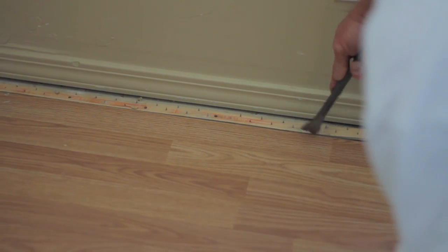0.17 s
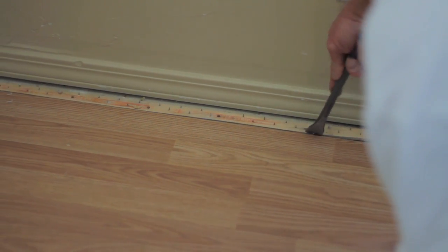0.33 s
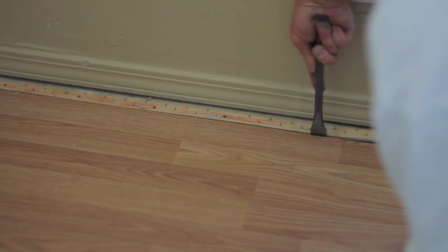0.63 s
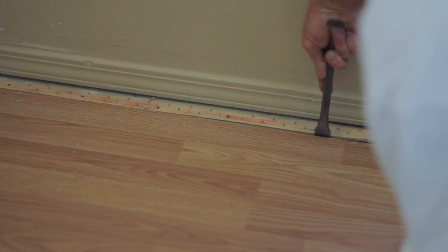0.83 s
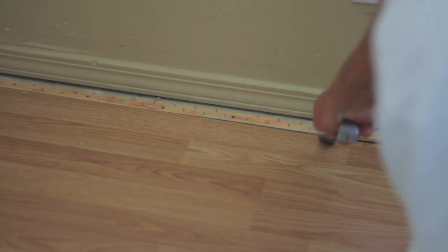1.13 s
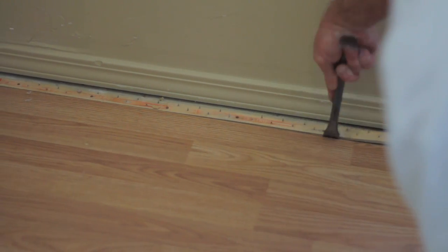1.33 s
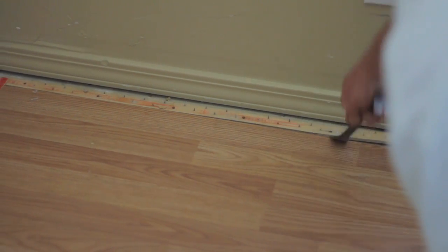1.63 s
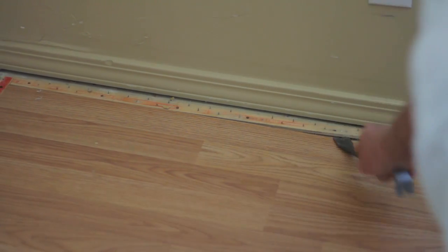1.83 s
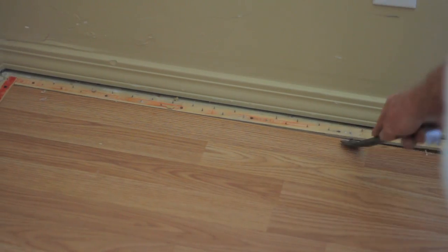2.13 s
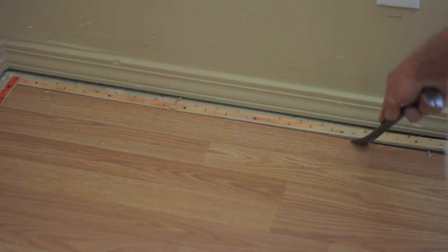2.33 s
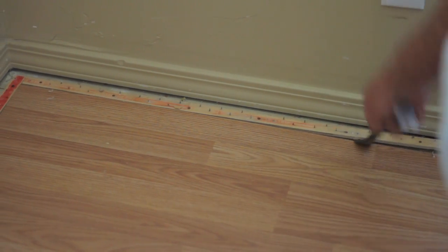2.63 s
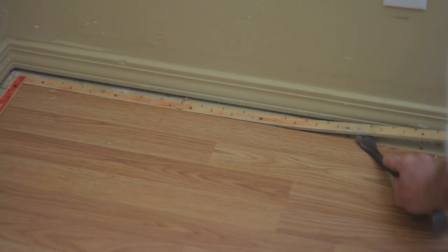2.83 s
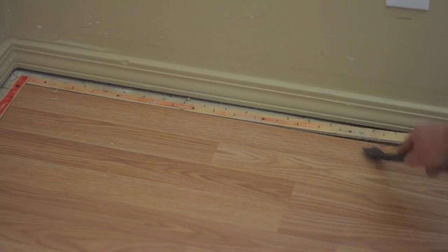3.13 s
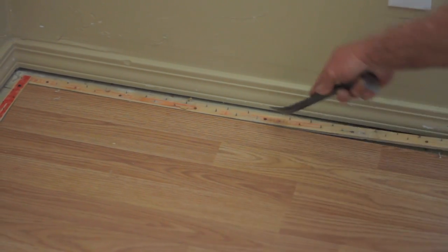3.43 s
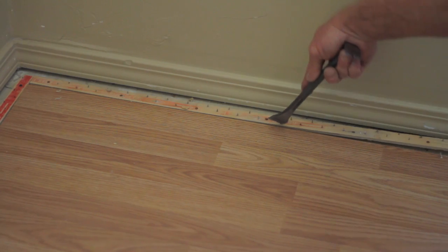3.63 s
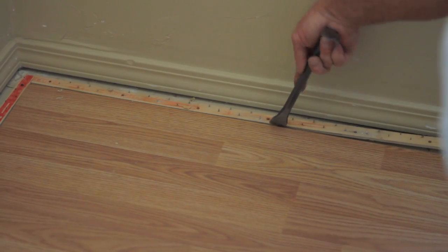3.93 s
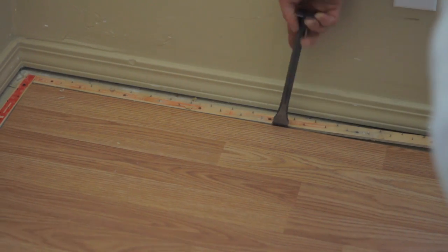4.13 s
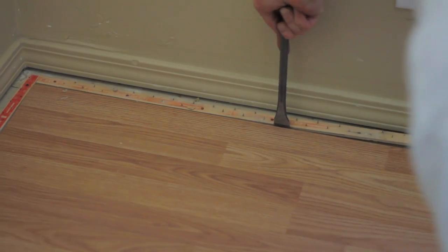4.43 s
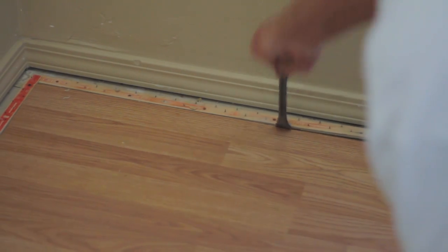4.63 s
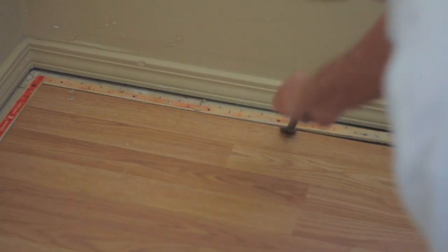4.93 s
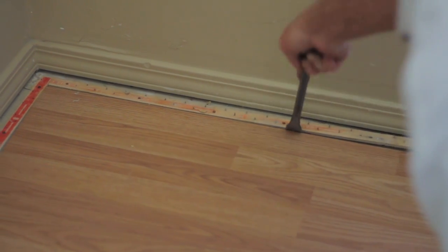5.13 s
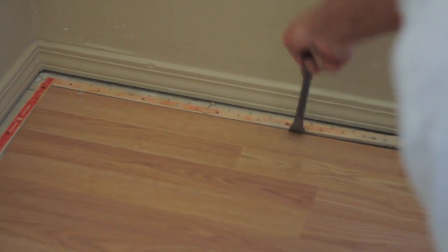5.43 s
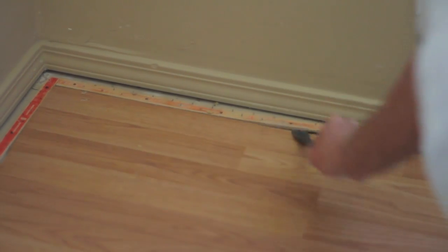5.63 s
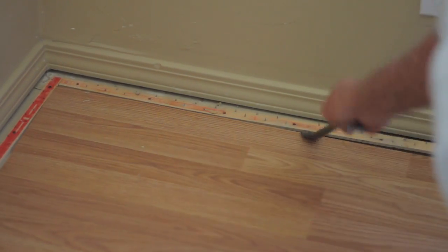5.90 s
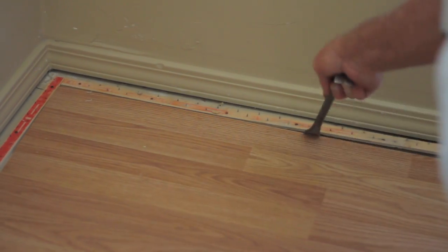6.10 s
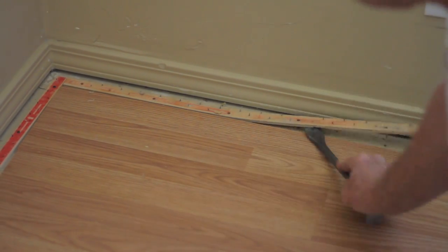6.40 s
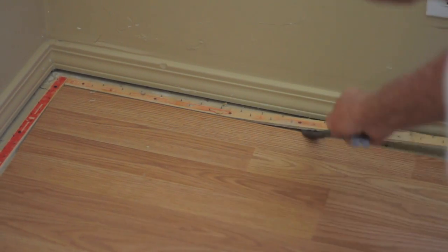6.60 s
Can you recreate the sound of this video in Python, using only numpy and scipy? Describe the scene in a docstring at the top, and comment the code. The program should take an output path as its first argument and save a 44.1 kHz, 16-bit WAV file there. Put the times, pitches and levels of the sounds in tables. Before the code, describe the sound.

Close indoor hand work: a pry bar bumps and rubs on a wooden floor with muffled thuds, short woody clacks and low rustling. A cluster of firmer knocks and crunches comes midway, then fewer bumps. A sudden bright nail crack follows, then a strip snap, the loudest hard knock of metal on floor, and another brittle snap with a low thud. Short room echo and soft steady hiss.

```python
"""A small steel pry bar levers a nailed wooden tack strip off the floor in a bare room.
The blade scrapes grit, crunches and knocks: slips and brief contacts are noise through resonant bands.
Splinters tick in bright bands. A nail tears out, the strip snaps twice and the bar strikes the floor:
sudden jolts excite many modes, with crumbling noise. Low notes rung by jolts and knocks are decaying sines.
A soft rustling bed and a quiet hiss are shaped noise; diffuse, decaying noise supplies the room's echo."""
import sys
import numpy as np
from scipy import signal
from scipy.fft import rfft, irfft, next_fast_len
from scipy.io import wavfile

SR = 44100
rng = np.random.default_rng(int(sys.argv[2]) if len(sys.argv) > 2 else 0)


def wrap_up_sound(samples):
    """Save the sound to the file named by the first command line argument, as 16-bit audio."""
    columns = np.atleast_2d(samples).T
    # keep every value between -1 and 1, then stretch to whole-number steps
    tamed = np.clip(columns, -1, 1)
    steps = np.round(tamed * 32767).astype(np.int16)
    wavfile.write(sys.argv[1], SR, steps)


N = 298108
TIME = np.arange(N) / SR
BLOW_TIME = np.arange(SR // 5) / SR

# Event levels are rms over 1/50 s, before any later filter or added debris; lengths are decay scales.
# Bar knocking on the floor as it is set and levered:
# (time [s], contact length [s], thump level [dB], board rap level [dB], upper cutoff of the rap [Hz])
KNOCK_EVENTS = [(0.074, 0.026, -65, -48, 513), (0.124, 0.011, -49, -43, 840),
                (0.427, .016, -47, -44.5, 770), (0.732, 0.0093, -41.5, -56, 456),
                (1.014, 0.025, -50, -60, 450), (1.118, 0.0023, -45, -80, 450),
                (1.208, 0.0086, -57, -51, 690), (1.593, 0.0039, -53, -82, 450),
                (1.704, 0.016, -46, -52, 450), (1.869, .012, -55, -59, 1000),
                (1.961, .022, -61, -62.5, 1600), (2.035, 0.031, -57, -68, 1450),
                (2.107, .0096, -56, -49.5, 690), (2.143, .0075, -49, -58, 1100),
                (2.42, 0.01, -52, -44.5, 1440), (2.63, 0.026, -44.5, -51.5, 840),
                (2.68, 0.0043, -37.5, -42.5, 636), (2.855, 0.035, -45.5, -56, 504),
                (2.963, 0.0048, -40, -39.5, 1140), (3.034, 0.038, -38, -54, 654),
                (3.297, 0.006, -40, -39, 1110), (3.727, .0074, -46, -43.5, 1390),
                (3.988, 0.009, -55, -48, 1350), (4.06, 0.022, -50.5, -47.5, 730),
                (4.36, 0.0054, -46, -53, 780), (4.689, 0.0071, -81, -63, 1400),
                (5.222, 0.0081, -46, -54.5, 1080), (5.798, 0.0038, -70, -54, 1430),
                (6.039, 0.0029, -66, -54.5, 590), (6.259, 0.01, -51, -51.5, 1050),
                (6.324, 0.0053, -45.5, -54.5, 1020), (6.495, 0.026, -53, -44, 1040),
                (6.516, 0.015, -38.5, -41, 1140)]
# Wood splintering under the blade: (time [s], length [s], snap level [dB])
SPLINTER_EVENTS = [(0.117, 0.0063, -64.5), (1.209, 0.0092, -58), (1.832, 0.0021, -74),
                   (1.855, 0.0033, -67.5), (1.871, 0.0089, -67), (2.106, .013, -65), (2.388, 0.0045, -60.5),
                   (2.416, 0.013, -64), (2.669, .014, -65.5), (2.96, 0.014, -67), (3.291, 0.012, -61.5),
                   (5.203, .001, -75.5), (5.766, 0.012, -57), (5.796, 0.00062, -63.5), (5.808, .0014, -71),
                   (6.309, 0.0017, -70), (6.474, .001, -64), (6.519, 0.01, -64)]
# Nail tearing out: (time [s], length [s], level [dB])
NAIL_EVENTS = [(5.0162, .004, -30), (5.0187, .006, -26), (5.0305, .006, -36), (5.045, .007, -37.5)]
# Strip snapping: (time [s], length [s], level [dB])
SNAP_EVENTS = [(5.7518, 0.0025, -38), (6.4545, 0.0036, -32)]
# Slipped bar striking the floor: (time [s], length [s], level [dB])
STRIKE_EVENTS = [(5.9016, .003, -23.2)]
# Low notes rung by jolts and knocks, including the nail's thump:
# (time [s], frequency [Hz], amplitude before onset and decay [dB], t60 [s])
LOW_NOTE_EVENTS = [(0.737, 62.3, -47, 0.28), (2.682, 103, -33, .13), (2.975, 57.4, -45.5, 0.99),
                   (2.966, 355, -40, 0.3), (3.052, 109.2, -36, 0.23), (3.297, 589, -28.5, 0.081),
                   (4.061, 638, -31.5, 0.072), (5.017, 152, -24, 0.14), (5.751, 347.5, -37, 0.14),
                   (6.515, 435, -38, 0.19), (6.548, 104.7, -41, 0.92)]
# Shoves forcing the blade under the wood: (start [s], end [s], peak of the swell [dB])
SHOVE_STROKES = [(.045, .16, -49), (1.23, 1.46, -63.5), (1.93, 2.18, -63), (2.87, 3.12, -52.5),
                 (3.24, 3.36, -48.5), (4.87, 5.01, -60.5)]
# Blade grinding through grit: (start [s], end [s], peak of the swell [dB])
SCRAPE_STROKES = [(-.06, 0.075, -57.5), (1.191, 1.291, -57), (1.82, 2.17, -70.5), (2.385, 2.44, -51),
                  (2.882, 3.112, -64), (3.223, 3.364, -55), (3.309, 3.346, -55.5), (4.873, 5.01, -56),
                  (6.467, 6.595, -60)]
# Loudness of the soft rustling bed, used relative to the mean of the rows: (time [s], level [dB])
BED_LOUDNESS = [(0.0, -61), (0.21, -75), (0.69, -75), (1.24, -68.5), (1.75, -73.5), (1.98, -65.5),
                (2.73, -68), (2.86, -63), (3.62, -70), (4.07, -58.5), (4.7, -73.5), (5.1, -59.5),
                (5.25, -66), (5.42, -81), (5.74, -71.5), (5.93, -55.5), (6.49, -63), (6.76, -62)]

# Resonances: (frequency [Hz], bandwidth [Hz], relative level density [dB per Hz])
# the heavy floor
THUMP_MODES = [(52, 86, -59), (97.2, 3.7, 7), (112.6, 38, 14.5), (166, 74, -6)]
# floorboards
BOARD_MODES = [(236, 193, -0.74), (339, 41, 6), (446, 70, -7.5)]
# the strip's clack under a knock
CLACK_MODES = [(627, 113, 15.5), (730, 27, -16), (846, 22, 13), (1260, 750, -9), (2050, 1300, -2)]
# breaking splinters, lower bands
SNAP_MODES = [(2290, 880, 0), (3650, 1500, 1), (5830, 1200, 0.5)]
# breaking splinters, treble bands
FIZZ_MODES = [(7500, 3700, 0.5), (11100, 3200, -3), (13900, 2400, 4.5)]
# nail tearing loose
NAIL_MODES = [(48, 40, -9), (122, 45, -1), (410, 90, -7), (638, 40, 1), (883, 45, -2), (990, 50, -7),
              (1145, 50, -1), (1280, 60, -11), (2220, 110, -14), (2750, 100, -21), (3280, 100, -12),
              (3490, 100, -11), (4090, 110, -15), (4390, 130, -12), (5410, 100, -19), (5700, 150, -20),
              (6300, 500, -25), (8700, 80, -22), (9730, 100, -18), (10750, 160, -17), (11900, 100, -19),
              (13300, 200, -16), (14400, 400, -19), (15050, 200, -15)]
# snapping strip
STRIP_MODES = [(119, 200, 0.5), (364, 77, 7.5), (680, 160, 8), (990, 186, 7.5), (1310, 290, -1),
               (2100, 280, -11), (2780, 1040, -4.5), (3840, 620, -0.5), (4840, 770, -0.5), (6200, 900, 2),
               (8000, 1300, -1), (10340, 1100, 1.5), (12700, 2700, -7), (14700, 910, -6)]
# bar against floor
STRIKE_MODES = [(48, 50, -11), (110, 25, -1), (160, 40, -2), (315, 70, -6), (600, 80, -3), (775, 100, 4),
                (920, 110, 0), (1350, 200, -12), (2400, 700, -24), (3700, 700, -19), (4600, 900, -15),
                (5300, 900, -17), (6600, 1100, -21), (8200, 1000, -24), (9700, 800, -22)]
# crushed fibres
CRUMB_MODES = [(1100, 1800, 0.5), (4200, 8100, -4.5), (8700, 4600, -20)]

# Spectra: (frequency [Hz], relative level density [dB per Hz])
# the soft rustling bed before its band-pass, which leaves it low with a faint airy treble
BED_SPECTRUM = [(40, -47), (100, -2), (220, -13.5), (350, -6), (700, -13.5), (1200, -19.5), (1700, -24),
                (4000, 12)]
# crushed grit
GRIT_SPECTRUM = [(800, 4.5), (2000, -7.5), (4000, 0), (6000, -2), (9000, -10), (15000, -8)]
# steady background hiss
HISS_SPECTRUM = [(20, 8.8), (45, 7.4), (100, 18.2), (200, 14), (400, 10.2), (700, 6.5), (1300, 4),
                 (2500, 2.05), (6000, 2.4), (15000, 1.9)]
# wood under a forced blade
CRUNCH_SPECTRUM = [(60, -15), (240, -0.5), (400, 1), (800, -11), (1250, -13.5), (1600, -34), (2300, -21.5),
                   (4000, -29.5)]

# Decay of the room: (frequency [Hz], t60 [s])
ROOM_DECAY = [(100, .26), (400, .27), (1000, .26), (4000, .28), (9000, .25), (15000, .22)]
# Echo of the room: (frequency [Hz], echo level [dB])
ROOM_LEVEL = [(100, -8), (400, -6), (1000, -7.5), (4000, -6.5), (9000, -8), (15000, -9)]

HISS_DB = -63.5
BED_DB, BED_FOLLOWS = -68, 1.11  # level at mean loudness; dB per dB of the loudness curve
BED_LOW_HZ, BED_TOP_HZ = 35, 1700
CLACK_DB, THUMP_LAG_S = -3, 0.0033  # clack against board rap; the heavy floor answers later
# after each knock the bar rocks back, weaker and duller
REBOUND_S, REBOUND_DB, REBOUND_PITCH_SHARE = 0.038, -15.5, 0.81
# small chance knocks; levels at mean bed loudness, random spread either way, dB per dB of bed loudness
NUDGES_PER_S, NUDGE_S, NUDGE_TOP_HZ = 5, 0.015, 1420
NUDGE_THUMP_DB, NUDGE_RAP_DB, NUDGE_SPREAD_DB, NUDGE_FOLLOWS = -62.5, -64.5, 1, 0.9
# fizz against snap at the reference length; quicker breaks are brighter
FIZZ_DB, FIZZ_AT_S, FIZZ_DB_PER_DOUBLING = 8.5, 0.0038, -2
# fibres around each splinter: earliest and latest moment, length, level against the splinter
FIBRE_BEFORE_S, FIBRE_AFTER_S, FIBRE_S, FIBRE_DB = 0.011, 0.05, 0.0028, -18
KNOCK_ECHO_DB = -1.5  # dull sounds come mostly straight through the floor, so they are drier
CUTOFF_HZ = 15700


def from_db(db):
    """Level in decibels gives amplitude gain as a power of ten."""
    return 10 ** (np.asarray(db) / 20)


def rms_one(x):
    """Division by the root mean square gives unit mean power."""
    return x / np.sqrt(np.mean(x ** 2) + 1e-20)


def unit_energy(rows):
    """Division by the norm gives each row unit energy."""
    return rows / np.linalg.norm(rows, axis=1, keepdims=True)


def at_hz(points, hz):
    """Interpolation is linear in the logarithm of frequency."""
    freqs, values = np.transpose(points)
    return np.interp(np.log(np.maximum(hz, 1)), np.log(freqs), values)


def coloured(x, spectrum):
    """Multiplication in the frequency domain shapes the spectrum; mean power is then one."""
    size = next_fast_len(N)
    gain = from_db(at_hz(spectrum, np.fft.rfftfreq(size, 1 / SR)))
    return rms_one(irfft(rfft(x, size) * gain, size)[:N])


def band(x, low_hz, high_hz, order):
    """A causal band-pass responds only after its excitation."""
    edges = [max(low_hz, 10), min(high_hz, 0.45 * SR)]
    sos = signal.butter(order, edges, "band", fs=SR, output="sos")
    return signal.sosfilt(sos, x + 1e-18)


def grains(count, per_s, spread_db):
    """Granular noise: tiny impulses of uneven size occur at random moments."""
    sizes = rng.standard_normal(count) * from_db(spread_db * rng.standard_normal(count))
    return sizes * (rng.random(count) < per_s / SR)


def strokes(rows):
    """Stroke envelope: each swells and fades as half a sine."""
    out = np.zeros(N)
    for start, end, db in rows:
        progress = np.clip((TIME - start) / (end - start), 0, 1)
        out += from_db(db) * np.sin(np.pi * progress)
    return out


def bed_loudness_db(times):
    """Loudness of the bed is interpolated relative to the mean of its points."""
    s, db = np.transpose(BED_LOUDNESS)
    return np.interp(times, s, db - db.mean())


def contacts(lengths, roughness_db, punch):
    """Rough contact, one per row: a clean jolt within a rush of tiny slips that swells and dies."""
    draws = rng.standard_normal((len(lengths), 2, len(BLOW_TIME)))
    age = BLOW_TIME / np.maximum(lengths, 5e-4)[:, None]  # in contact lengths
    envelope = age ** 0.66 * np.exp(-2.6 * age)
    slips = draws[:, 0] * from_db(roughness_db * draws[:, 1]) * envelope
    jolt = np.diff(age > 0.1, axis=1, prepend=False)  # a single sample
    return unit_energy(slips) + punch * jolt


def rung(force, level_db, modes, order):
    """Modal excitation: each contact rings a body's resonances, alternate in sign."""
    rings = 0
    for k, (hz, width, db) in enumerate(modes):
        ring = unit_energy(band(force, hz - width / 2, hz + width / 2, order))
        rings = rings + (-1) ** k * from_db(db) * np.sqrt(width) * ring
    # rms is referred to a fiftieth of a second
    return from_db(level_db)[:, None] * unit_energy(rings) * np.sqrt(SR / 50)


def placed(sounds, times):
    """Superposition: short sounds add at their own times."""
    out = np.zeros(N + 2 * len(BLOW_TIME))
    for s, sound in zip(times, sounds):
        start = int(s * SR)
        out[start:start + len(sound)] += sound
    return out[:N]


def background_hiss():
    """Stationary noise: random samples with a fixed spectrum."""
    return from_db(HISS_DB) * coloured(rng.standard_normal(N), HISS_SPECTRUM)


def rustling_bed():
    """Amplitude modulation: a soft band of granular noise follows a loudness curve."""
    noise = coloured(grains(N, per_s=2000, spread_db=1.0), BED_SPECTRUM)
    rustle = rms_one(band(noise, BED_LOW_HZ, BED_TOP_HZ, order=4))
    return from_db(BED_DB + BED_FOLLOWS * bed_loudness_db(TIME)) * rustle


def scrapes():
    """Granular crushing: the blade breaks grit in many uneven impulses."""
    grit = grains(N, per_s=5000, spread_db=3.0)
    return strokes(SCRAPE_STROKES) * coloured(grit, GRIT_SPECTRUM)


def shoves():
    """Stick-slip friction: the blade crunches in sparse slips as it is forced under the wood."""
    crunch = coloured(grains(N, per_s=900, spread_db=2.0), CRUNCH_SPECTRUM)
    return strokes(SHOVE_STROKES) * crunch


def nudges():
    """Random light contact: small chance knocks, returned as rows like those of the knocks."""
    draws = rng.random((100, 2))
    times = (np.arange(len(draws)) + draws[:, 0]) / NUDGES_PER_S
    levels = NUDGE_SPREAD_DB * (2 * draws[:, 1] - 1) + NUDGE_FOLLOWS * bed_loudness_db(times)
    return [(s, NUDGE_S, NUDGE_THUMP_DB + db, NUDGE_RAP_DB + db, NUDGE_TOP_HZ)
            for s, db in zip(times, levels) if s < N / SR]


def knocks():
    """Impact through a yielding contact: the floor thumps, and boards and strip rap below a cutoff."""
    rebounds = [(s + REBOUND_S, length, thump + REBOUND_DB, rap + REBOUND_DB, hz * REBOUND_PITCH_SHARE)
                for s, length, thump, rap, hz in KNOCK_EVENTS]
    s, length, thump_db, rap_db, top_hz = np.vstack([KNOCK_EVENTS, rebounds, nudges()]).T
    force = contacts(length, roughness_db=2.0, punch=0.44)
    low_pass = signal.butter(2, 260, fs=SR, output="sos")
    thumps = signal.sosfilt(low_pass, rung(force, thump_db, THUMP_MODES, order=1))
    boards = rung(force, rap_db, BOARD_MODES, order=1)
    clacks = rung(force, rap_db + CLACK_DB, CLACK_MODES, order=1)
    # a yielding contact passes little above its cutoff
    raps = [band(rap, 161, hz, order=3) for rap, hz in zip(boards + clacks, top_hz)]
    return placed(thumps, s + THUMP_LAG_S) + placed(raps, s)


def splinters():
    """Brittle fracture: fibres break with short bright ticks, each with two weaker neighbours."""
    delays = rng.uniform(-FIBRE_BEFORE_S, FIBRE_AFTER_S, (len(SPLINTER_EVENTS), 2))
    fibres = [(s + delay, FIBRE_S, db + FIBRE_DB)
              for (s, _, db), pair in zip(SPLINTER_EVENTS, delays) for delay in pair]
    s, length, snap_db = np.vstack([SPLINTER_EVENTS, fibres]).T
    fizz_db = snap_db + FIZZ_DB + FIZZ_DB_PER_DOUBLING * np.log2(length / FIZZ_AT_S)
    force = contacts(length, roughness_db=-1.5, punch=0.29)
    snap = rung(force, snap_db, SNAP_MODES, order=2)
    fizz = rung(force, fizz_db, FIZZ_MODES, order=2)
    return placed(snap + fizz, s)


def low_notes():
    """Damped free vibration: each note rung by a jolt or knock is an exponentially decaying sine."""
    out = np.zeros(N)
    for s, hz, db, t60 in LOW_NOTE_EVENTS:
        age = np.maximum(TIME - s, 0)
        onset = 1 - np.exp(-age / 0.0043)
        out += from_db(db - 60 * age / t60) * onset * np.sin(2 * np.pi * hz * age)
    return out


def load_release(events, modes, punch, top_hz, crumble_db, crumble_s):
    """Sudden release of load: a body is set ringing, and crushed fibres crumble for a moment."""
    s, length, level_db = np.transpose(events)
    force = contacts(length, roughness_db=1.0, punch=punch)
    ringing = rung(force, level_db, modes, order=1)
    debris = contacts(length + crumble_s, roughness_db=-2.5, punch=0)
    crumbling = rung(debris, level_db + crumble_db, CRUMB_MODES, order=1)
    return band(placed(ringing + crumbling, s), 11, top_hz, order=3)


def nail_pulls():
    """Friction giving way: the nail tears out in a few jolts that excite many narrow modes."""
    return load_release(NAIL_EVENTS, NAIL_MODES, punch=0.67, top_hz=17900,
                        crumble_db=-12.5, crumble_s=0.0021)


def strip_snaps():
    """Bending fracture: the strip breaks abruptly and rings over broad bands."""
    return load_release(SNAP_EVENTS, STRIP_MODES, punch=0.78, top_hz=18000,
                        crumble_db=-15.5, crumble_s=0.011)


def floor_strike():
    """Impact excitation: the slipped bar strikes and rings the modes of bar on floor."""
    return load_release(STRIKE_EVENTS, STRIKE_MODES, punch=0.57, top_hz=12500,
                        crumble_db=-16.0, crumble_s=0.027)


def room(x, build_up_s):
    """Diffuse reverberation: echoes from floor and walls decay at a rate set by frequency."""
    age = np.arange(SR // 2) / SR
    edges = np.geomspace(40, 18000, 14)
    response = 0
    for low, high in zip(edges, edges[1:]):
        hz = np.sqrt(low * high)
        tail = band(rng.standard_normal(len(age)), low, high, order=2)
        tail *= from_db(-60 * age / at_hz(ROOM_DECAY, hz)) * (1 - np.exp(-age / build_up_s))
        # energy in proportion to bandwidth keeps the echo level independent of band count
        gain = from_db(at_hz(ROOM_LEVEL, hz)) * np.sqrt(2 * (high - low) / SR)
        response = response + gain * tail / np.linalg.norm(tail)
    return signal.fftconvolve(x, response)[:N]


def scene():
    """Superposition: the direct sounds of the work, their echo and a steady hiss add."""
    dull = rustling_bed() + shoves() + knocks()
    sharp = scrapes() + splinters() + nail_pulls() + strip_snaps() + floor_strike()
    echo = room(sharp + from_db(KNOCK_ECHO_DB) * dull, build_up_s=0.00097)
    return (sharp + dull + low_notes() + echo + background_hiss())[None]


def record(dry):
    """Steep low-pass: an elliptic filter removes the top of the spectrum."""
    # 0.1 dB passband ripple, 80 dB stopband rejection
    sos = signal.ellip(10, 0.1, 80, CUTOFF_HZ, fs=SR, output="sos")
    return signal.sosfilt(sos, dry)


dry = scene()
out = record(dry)
wrap_up_sound(out)
```